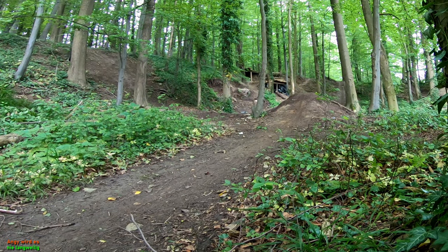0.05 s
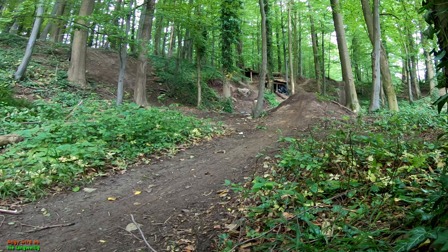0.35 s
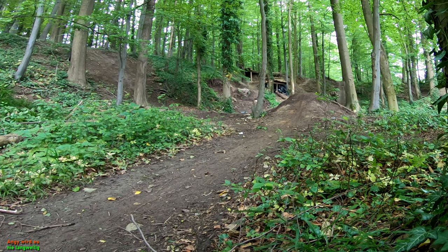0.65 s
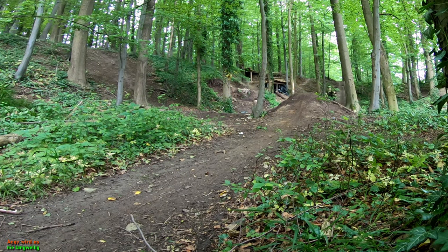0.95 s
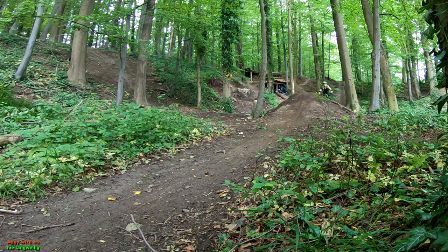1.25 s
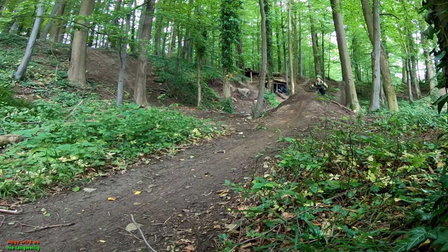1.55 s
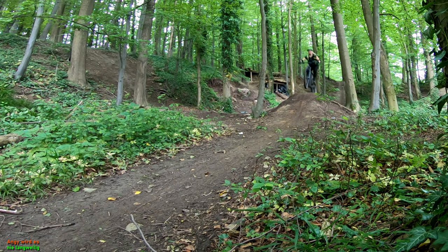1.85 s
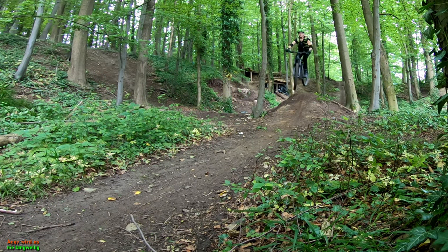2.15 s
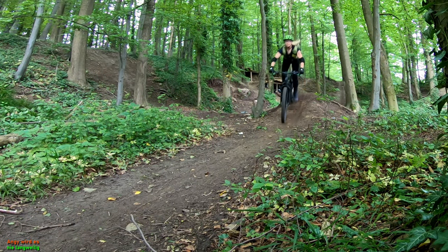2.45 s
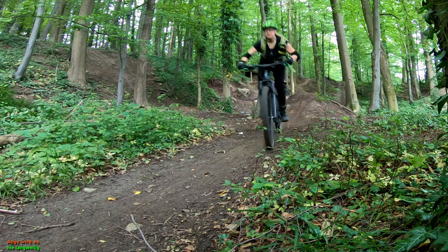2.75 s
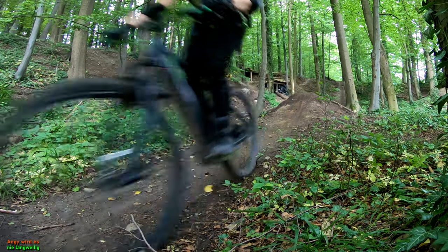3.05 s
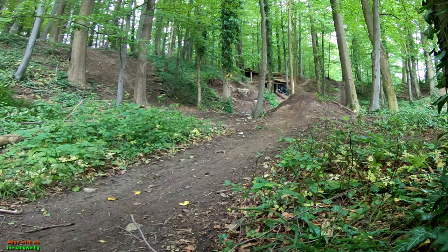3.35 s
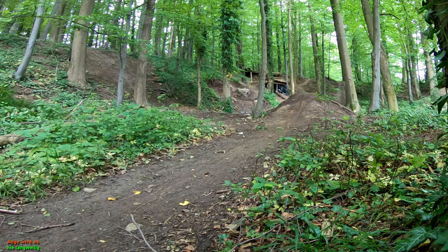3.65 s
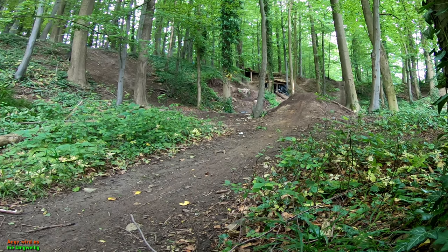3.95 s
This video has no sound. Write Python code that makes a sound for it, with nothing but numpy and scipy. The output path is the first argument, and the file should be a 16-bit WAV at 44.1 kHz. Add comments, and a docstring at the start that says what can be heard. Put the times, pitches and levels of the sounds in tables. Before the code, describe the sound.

Mountain bike tyres approach, thud down from a jump and crunch past, chain rattling.

```python
"""Forest leaves hiss throughout. A mountain bike rolls away, its freewheel ticking slower; far birds call.
A second bike drums up a dirt jump, its brake disc pinging against the pad, and flies.
It lands on both wheels: the ground thuds, the frame knocks, the chain rattles.
Knobbly tyres crunch over soil and snap stones as it rolls close past, then the rear tread howls away."""
import sys
import numpy as np
from scipy import signal
from scipy.fft import rfft, irfft
from scipy.io import wavfile

SR = 44100
rng = np.random.default_rng(int(sys.argv[2]) if len(sys.argv) > 2 else 0)


def master(y):
    """Save y as 16-bit WAV."""
    cut = np.clip(np.atleast_2d(y).T, -1, 1)
    pcm = np.round(cut * 32767)  # scale
    wavfile.write(sys.argv[1], SR, pcm.astype(np.int16))


N = 176400
T = np.arange(N) / SR


def amp(db):
    """Decibels to gain."""
    return 10 ** (np.asarray(db) / 20)


def unit(x):
    """Scale to rms 1."""
    return x / np.sqrt(np.mean(x ** 2) + 1e-20)


def levels(table):
    """One gain curve per dB column, fading beyond the table's ends."""
    times, *columns = np.transpose(table)
    outside_s = np.maximum(times[0] - T, 0) + np.maximum(T - times[-1], 0)
    return [amp(np.interp(T, times, db)) * np.exp(-outside_s / 0.12) for db in columns]


def shape(x, spectrum):
    """Minimum-phase filter, 12 dB/octave skirts."""
    knots_hz, db = np.transpose(spectrum)
    hz = abs(np.fft.fftfreq(8192, 1 / SR)) + 1
    skirt = np.maximum(np.log(hz / knots_hz[-1]), 0) + np.maximum(np.log(knots_hz[0] / hz), 0)
    log_gain = np.log(amp(np.interp(np.log(hz), np.log(knots_hz), db))) - 2 * skirt
    taps = np.fft.ifft(np.exp(np.conj(signal.hilbert(log_gain)))).real[:4096]
    return signal.oaconvolve(x, taps)[:N]


def noise(spectrum):
    """Coloured noise, rms 1."""
    return unit(shape(rng.standard_normal(N), spectrum))


def wander(rate_hz):
    """Low-passed random drift, rms 1."""
    hz = np.fft.rfftfreq(N, 1 / SR)
    return unit(irfft(rfft(rng.standard_normal(N)) * np.exp(-(hz / rate_hz) ** 2), N))


def tone(hz, width_hz):
    """Wavering resonance on a pitch or pitch curve."""
    drift = wander(width_hz) + 1j * wander(width_hz)
    drift /= (abs(drift) + 1e-6) ** 0.33  # steadies the level
    carrier = np.exp(2j * np.pi * np.cumsum(hz * np.ones(N)) / SR)
    return unit((drift * carrier).real)


def grains(per_s, spread_db):
    """Random clicks of uneven size."""
    size = amp(spread_db * np.minimum(rng.exponential(1, N), 4))
    return unit(size * rng.choice([-1, 1], N) * (rng.random(N) < per_s / SR))


def burst(start_s, rise_s, fade_s, hold_s=0):
    """Linear attack, hold, exponential release."""
    release = np.exp(-np.maximum(T - start_s - rise_s - hold_s, 0) / fade_s)
    return np.clip((T - start_s) / rise_s, 0, 1) * release


def ring(modes, t):
    """Decaying modes, t seconds after a blow."""
    return sum(amp(db - 60 * t / t60) * np.sin(2 * np.pi * hz * t) for hz, db, t60 in modes)


PASS_S, PASS_WIDTH_S, DOPPLER_RATIO = 3.32, 0.084, 0.017
def passing():
    """-1 on approach, +1 once the bike is past."""
    return np.tanh((T - PASS_S) / PASS_WIDTH_S)


# Leaves and air: freq_hz, gain_db
FOREST_SPECTRUM = [(25, -15), (80, -12), (112, -21), (150, 6), (225, -4), (300, -18.5), (950, -25.5),
                   (1900, -19.5), (4500, -21.5), (5900, -39), (7500, -38), (9500, -49), (11300, -45.5),
                   (15500, -64)]
def forest():
    """Leaves hiss over a low murmur of air."""
    return amp(-42) * noise(FOREST_SPECTRUM)


# First bike's tyres: time_s, hum_db, crunch_db, grit_db
LEAVING_LEVELS = [(0, -34, -37, -44), (.07, -35.5, -44, -44), (.2, -38, -46, -49.5), (.38, -39, -56.5, -55),
                  (.62, -62, -62.5, -84)]
# Tyre casing: freq_hz, gain_db
RUMBLE_SPECTRUM = [(20, -23), (38, 5), (90, 16), (140, 4), (300, -18.5)]
# Soil heard from behind a bike: freq_hz, gain_db
SOIL_BEHIND_SPECTRUM = [(150, -24), (300, 0.5), (470, -4.5), (670, 2.5), (850, 0.5), (1020, -29.5),
                        (1220, -3), (1500, -20.5)]
# Crushed grit: freq_hz, gain_db
GRIT_SPECTRUM = [(800, 3.5), (1500, 6), (2250, 4), (2700, 9.5), (3100, 4), (4300, 4), (5200, 0),
                 (6200, -10.5), (9000, -12.5)]
def leaving_bike():
    """The first bike's tyres throb and crunch away."""
    hum, crunch, grit = levels(LEAVING_LEVELS)
    throb_hz, throb_db = 10.55, 3
    throb = amp(throb_db * np.cos(2 * np.pi * throb_hz * T))
    casing = tone(hz=199, width_hz=56) + amp(-11) * noise(RUMBLE_SPECTRUM)
    clicks = grains(per_s=4900, spread_db=1)
    soil = unit(shape(clicks, SOIL_BEHIND_SPECTRUM))
    sand = unit(shape(clicks, GRIT_SPECTRUM))
    return hum * throb * casing + crunch * soil + grit * sand


# Freewheel ticking: time_s, level_db
FREEWHEEL_LEVELS = [(0, -43), (.2, -50), (.43, -47), (.52, -56), (1.2, -65), (2.8, -50), (2.9, -43),
                    (3.25, -41), (3.45, -32), (3.62, -40), (4, -46)]
# Pawl snap: freq_hz, gain_db
PAWL_SPECTRUM = [(1800, 1.5), (5100, 0.5), (6300, -5.5), (8700, -4), (12000, -31)]
# Hub ring: pitch_hz, level_db, t60_s
HUB_MODES = [(2720, -14, 0.02), (2450, -17.5, 0.012), (5087, -22, 0.012)]
def freewheel():
    """Pawls snap over the ratchet, slowing on the first bike; from afar the hub's ring dominates."""
    first_hz, slowing_s, second_hz, snap_s = 76.8, 1.25, 71.34, 0.0052
    rate_hz = np.where(T < 1, first_hz * np.exp(-T / slowing_s), second_hz)
    teeth = np.cumsum(rate_hz) / SR
    snaps = np.exp(-(teeth % 1) / rate_hz / snap_s) * rng.standard_normal(N)
    strikes = np.diff(np.floor(teeth), prepend=0) * rng.choice([-1, 1], N)
    hub = unit(signal.oaconvolve(0.5 * unit(strikes) + unit(snaps), ring(HUB_MODES, T[:SR]))[:N])
    level = levels(FREEWHEEL_LEVELS)[0]
    nearness = level / level.max()
    return level * (nearness * unit(shape(snaps, PAWL_SPECTRUM)) + amp(-2) * hub)


# Tyre scuffs: start_s, level_db, hold_s
SCUFF_EVENTS = [(0.044, -39.5, 0.0082), (1.435, -50.5, 0.081), (1.802, -44.5, 0.03), (2.63, -38.5, 0.098)]
# Dirt spray: freq_hz, gain_db
SCUFF_SPECTRUM = [(900, -6.5), (1400, 6), (4200, 3), (5600, -15.5)]
def scuffs():
    """Tyres throw short sprays of loose dirt."""
    sprays = sum(amp(db) * burst(start, 0.012, 0.051, hold) for start, db, hold in SCUFF_EVENTS)
    return sprays * noise(SCUFF_SPECTRUM)


# Tyres on run-up and ramp: time_s, rumble_db, drum_db
RUN_UP_LEVELS = [(.68, -53, -56), (.75, -38, -46), (.9, -44, -58.5), (1.2, -37, -45), (1.45, -35, -49),
                 (1.62, -28, -37.5), (1.8, -24, -37.5), (1.93, -34, -47), (2.14, -34.5, -49.5),
                 (2.45, -38.5, -97)]
# Tread drumming: freq_hz, gain_db
DRUM_SPECTRUM = [(90, -22.5), (150, -10), (210, 2.5), (290, -8.5), (420, -6.5), (650, -22.5), (2500, -28.5)]
def run_up():
    """The second bike's tyres drum up the ramp."""
    rumble, drum = levels(RUN_UP_LEVELS)
    casing = amp(-13) * noise(RUMBLE_SPECTRUM) + amp(-7) * tone(hz=74.1, width_hz=7.8)
    return rumble * casing + drum * noise(DRUM_SPECTRUM)


# Bird calls: start_s, length_s, pitch_hz, width_hz, level_db
BIRD_NOTES = [(0.71, 0.32, 4920, 432, -53.5), (0.866, 0.069, 2050, 35, -47.5),
              (1.093, 0.3, 2160, 148.1, -54), (1.362, 0.096, 2840, 110, -49),
              (1.884, 0.24, 1845, 40, -50.5)]
def birds():
    """Far birds call in faint, wavering notes."""
    calls = np.zeros(N)
    for start_s, length_s, pitch_hz, width_hz, level_db in BIRD_NOTES:
        arch = np.sqrt(abs(np.sin(np.pi * np.clip((T - start_s) / length_s, 0, 1))))
        calls += amp(level_db) * arch * tone(pitch_hz, width_hz)
    return calls


# Disc touching its pad: start_s, level_db
DISC_TOUCHES = [(.712, -66), (.965, -63), (1.39, -59), (1.66, -55), (1.845, -59), (2.33, -58), (2.485, -55),
                (2.634, -42), (2.998, -41), (3.288, -37.5), (3.38, -42), (3.47, -34), (3.736, -46)]
def brake_disc():
    """The disc jingles at each brush and shivers up the ramp; its pitch drops at the pass."""
    touches = sum(amp(db) * burst(start, 0.0033, 0.012, 0.027) for start, db in DISC_TOUCHES)
    shiver = amp(-66) * burst(1, rise_s=0.45, fade_s=0.12, hold_s=0.5)
    pitch_hz = 7274 * (1 - DOPPLER_RATIO * passing())
    jingle = unit(tone(pitch_hz, width_hz=68) + amp(-4) * tone(pitch_hz, width_hz=400))
    return (touches + shiver) * jingle


# Echo between trees: low_hz, high_hz, t60_s
ECHO_BANDS = [(99, 950, 0.19), (870, 6800, 0.78)]
def tree_echo(x):
    """Trunks scatter sound into a tail of echoes."""
    t = T[:SR]
    echoes_per_s, delay_s = 2500, 0.008
    taps = rng.choice([-1, 1], SR) * (rng.random(SR) < echoes_per_s / SR) * (t > delay_s)
    tail = np.zeros(SR)
    for low_hz, high_hz, t60_s in ECHO_BANDS:
        band = signal.butter(2, [low_hz, high_hz], "band", fs=SR, output="sos")
        tail += signal.sosfilt(band, taps) * amp(-60 * t / t60_s)
    return signal.oaconvolve(x, tail / np.linalg.norm(tail))[:N]


# Fine dust and other high hiss: freq_hz, gain_db
HISS_SPECTRUM = [(4000, -14), (7000, 7.5), (10000, 1), (11200, 2), (13500, -10), (16000, -17)]
def flight_hiss():
    """A thin hiss spans take-off to landing."""
    return amp(-68.5) * burst(1.35, rise_s=0.61, fade_s=0.1, hold_s=0.87) * noise(HISS_SPECTRUM)


# Tyres after landing, relative levels: time_s, rumble_db, hum_db, crunch_db, grit_db, dust_db
ROLL_LEVELS = [(2.515, -36, -34, -41.5, -37.5, -76), (2.55, -23.5, -35, -27, -30, -63),
               (2.68, -37.5, -24, -21.5, -41.5, -46), (2.83, -31.5, -22, -28, -39.5, -55),
               (2.97, -30, -22.5, -25.5, -34.5, -77), (3.13, -29, -22, -26, -28.5, -53),
               (3.27, -18.5, -29.5, -24.5, -25, -46.5), (3.47, -13.5, -23, -25, -26, -39),
               (3.62, -24.5, -21, -26, -33.5, -46.5), (3.76, -25, -19.5, -32.5, -37, -53.5),
               (4, -30, -33.5, -34, -40, -53)]
# Soil heard from ahead of the bike: freq_hz, gain_db
SOIL_FRONT_SPECTRUM = [(180, -14), (300, 1), (450, 1), (650, -7.5), (1500, -23)]
def tyres():
    """The casing rumbles and hums; knobs crush clumps of soil, grit and gravel."""
    rumble, hum, crunch, grit, dust = levels(ROLL_LEVELS)
    behind = (1 + passing()) / 2
    doppler = 1 - DOPPLER_RATIO * passing()
    clumps = np.tanh(wander(rate_hz=93))
    soil_clicks = grains(per_s=1500, spread_db=1) * amp(4.9 * clumps)
    soil = np.sqrt(1 - behind) * unit(shape(soil_clicks, SOIL_FRONT_SPECTRUM))
    soil += np.sqrt(behind) * unit(shape(soil_clicks, SOIL_BEHIND_SPECTRUM))
    grit_clicks = grains(per_s=3400, spread_db=2) * amp(2.6 * clumps)
    coarse = amp(-3.5) * unit(shape(grit_clicks, GRIT_SPECTRUM)) + amp(-4) * gravel()
    fine = noise(HISS_SPECTRUM) * unit(amp(2.8 * wander(rate_hz=79)))
    casing = amp(-3.5) * noise(RUMBLE_SPECTRUM) + amp(-1) * tone(hz=95 * doppler, width_hz=53)
    hollow = tone(hz=202.9 * doppler, width_hz=39)
    rolling = rumble * casing + hum * hollow + crunch * soil + grit * coarse
    return amp(-4.5) * rolling + amp(-3.5) * dust * fine


def gravel():
    """Small stones click together, each at its own pitch."""
    t = T[:SR // 40]
    clicks_per_s, decay_cycles = 350, 6.7
    pitches_hz = np.geomspace(1437, 3820, 30)
    clicks = np.zeros(N)
    for hz in pitches_hz:
        strikes = grains(clicks_per_s / len(pitches_hz), spread_db=2.5)
        click = np.exp(-t * hz / decay_cycles) * np.sin(2 * np.pi * hz * t)
        clicks += signal.oaconvolve(strikes, click)[:N]
    return unit(clicks * amp(2.8 * np.tanh(wander(rate_hz=34))))


# Landings and bumps: start_s, thud_db, knock_db, rattle_db
BLOWS = [(2.521, -19, -25, -29.5), (2.6221, -17.5, -19, -22.5), (2.685, -37, -23, -27),
         (2.787, -33, -21.5, -30.5), (2.925, -34, -24.5, -42), (3.045, -40, -33, -25), (3.2, -16, -13, -43),
         (3.596, -23, -24.5, -26), (3.686, -27, -24, -29), (3.766, -22, -24.5, -37),
         (3.841, -41, -38, -35.5)]
# Frame knock: freq_hz, gain_db
KNOCK_SPECTRUM = [(80, -30), (200, 4.5), (380, 1), (650, -7), (1000, -24.5)]
# Chain rattle: freq_hz, gain_db
RATTLE_SPECTRUM = [(300, -41.5), (750, 17), (1300, 5), (2700, 5), (4200, 6), (6500, -13)]
# Sharp, bright ticks of flung grit: start_s, level_db
GRIT_TICKS = [(2.6265, -31), (2.686, -32), (2.714, -37), (3.045, -32)]
def bumps():
    """Each blow pushes the ground, knocks the frame and shakes the chain; flung grit ticks."""
    thud, knock, rattle = np.zeros((3, N))
    thud_hz = 50
    for start_s, thud_db, knock_db, rattle_db in BLOWS:
        ground = np.sin(2 * np.pi * thud_hz * (T - start_s))
        thud += amp(thud_db) * burst(start_s, rise_s=0.0073, fade_s=0.024) * ground
        knock += amp(knock_db) * burst(start_s, rise_s=0.0032, fade_s=0.012)
        rattle += amp(rattle_db) * burst(start_s, rise_s=0.00084, fade_s=0.011)
    ticks = sum(amp(db) * burst(start, rise_s=0.00038, fade_s=0.0011) for start, db in GRIT_TICKS)
    frame = knock * noise(KNOCK_SPECTRUM)
    chain = rattle * noise(RATTLE_SPECTRUM)
    return thud + frame + chain + ticks * noise(HISS_SPECTRUM)


# Stones snapping under the tyres: start_s, level_db, pitch_ratio
STONE_SNAPS = [(2.827, -26, .9), (2.879, -26, 2.9), (2.927, -23, .85), (3.052, -18.5, 1.8),
               (3.092, -24, 2.8), (3.193, -22, 1.8), (3.3595, -11, 1), (3.383, -18, .8), (3.532, -16.5, .9),
               (3.619, -19.5, 1.25), (3.845, -23.5, 1.3)]
# Stone at pitch ratio 1: pitch_hz, level_db, t60_s
STONE_MODES = [(750, -3, .025), (1000, -1, .024), (1250, -1, .014), (2800, -5, .004)]
def stones():
    """Hard clacks; smaller stones ring higher and die sooner."""
    return sum(amp(db) * ring(STONE_MODES, ratio * np.maximum(T - start, 0))
               for start, db, ratio in STONE_SNAPS)


def tread_howl():
    """Behind the bike the rear tread sings a hollow tone that sags as it leaves."""
    sag_start_s, sag_hz_per_s = 3.58, 450
    pitch_hz = 681 - sag_hz_per_s * np.maximum(T - sag_start_s, 0)
    swell = burst(PASS_S, rise_s=0.19, fade_s=0.17, hold_s=0.063)
    return amp(-31) * swell * tone(pitch_hz, width_hz=92)


# Microphone width, relative side level: freq_hz, gain_db
SIDE_SPECTRUM = [(1000, -40.5), (10500, -9.5), (12500, 19)]
def scene():
    """Stereo mix, near mono except in the top treble."""
    hits = bumps() + stones()
    disc = brake_disc()
    mid = tyres() + tread_howl() + leaving_bike() + run_up() + scuffs() + flight_hiss()
    mid += freewheel() + birds() + forest() + hits + disc
    mid += tree_echo(amp(-8) * hits + amp(-10.5) * disc)
    side = amp(-18.5) * shape(mid * wander(rate_hz=130), SIDE_SPECTRUM)
    return np.array([mid + side, mid - side])


def record(dry):
    """Steep low-pass."""
    cutoff_hz = 15700
    taps = signal.firwin(511, cutoff_hz, window=("kaiser", 9), fs=SR)
    return signal.oaconvolve(dry, taps[None], "same")


dry = scene()
out = record(dry)
master(out)
```